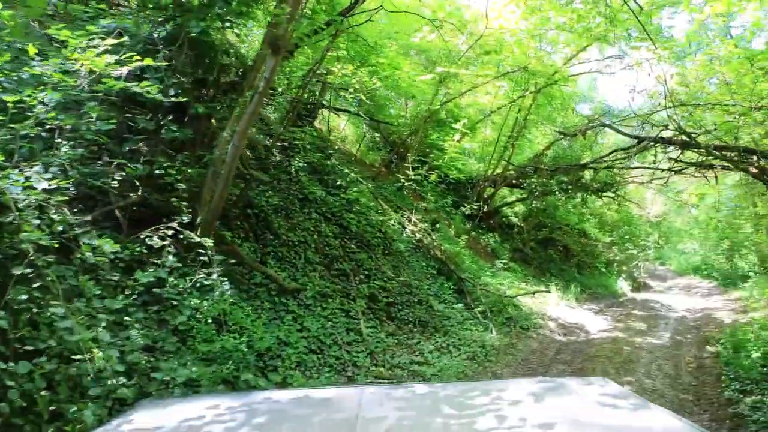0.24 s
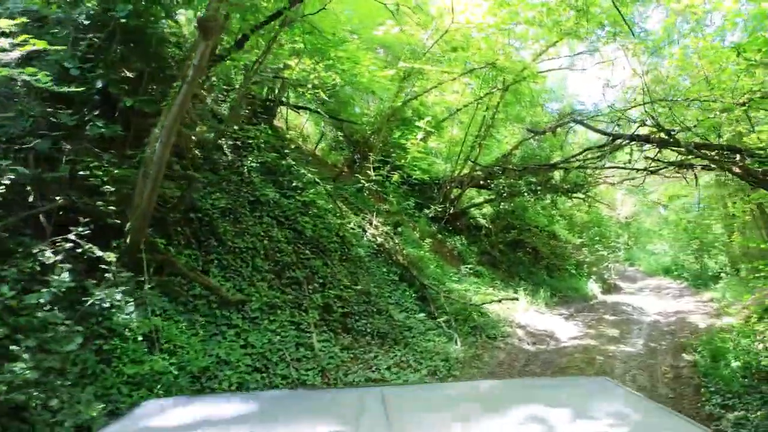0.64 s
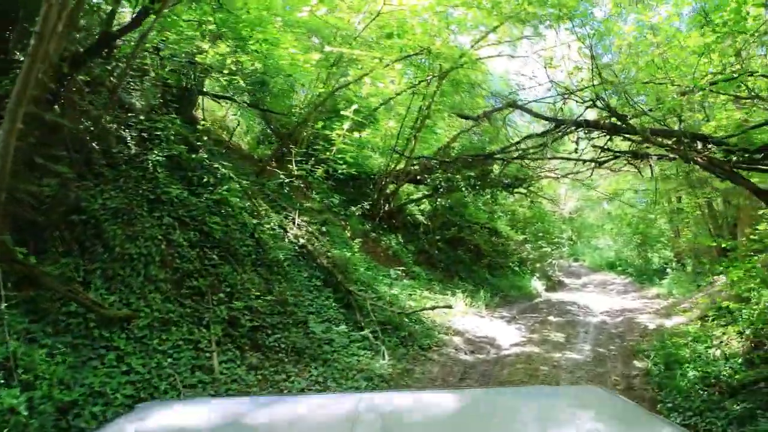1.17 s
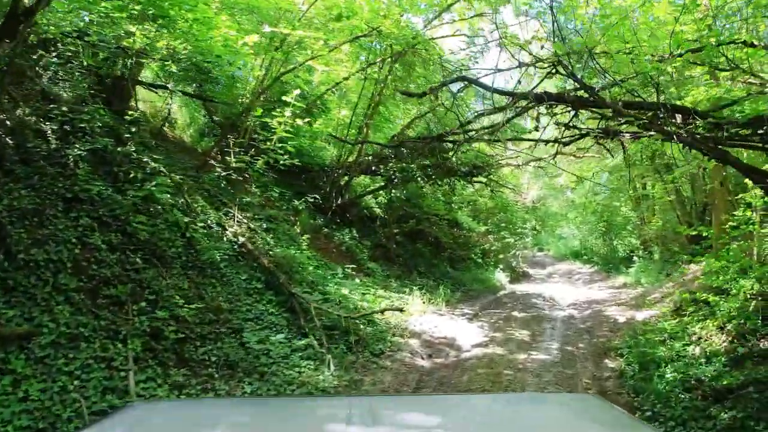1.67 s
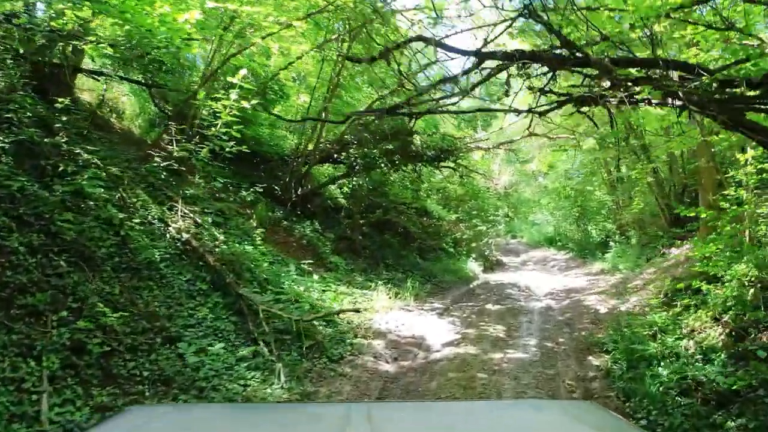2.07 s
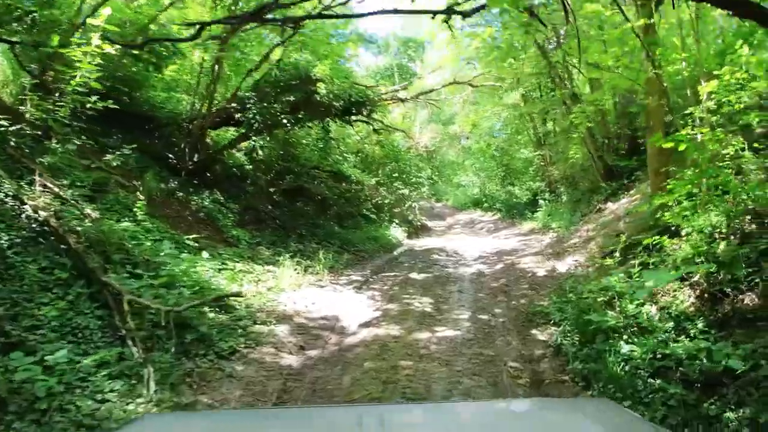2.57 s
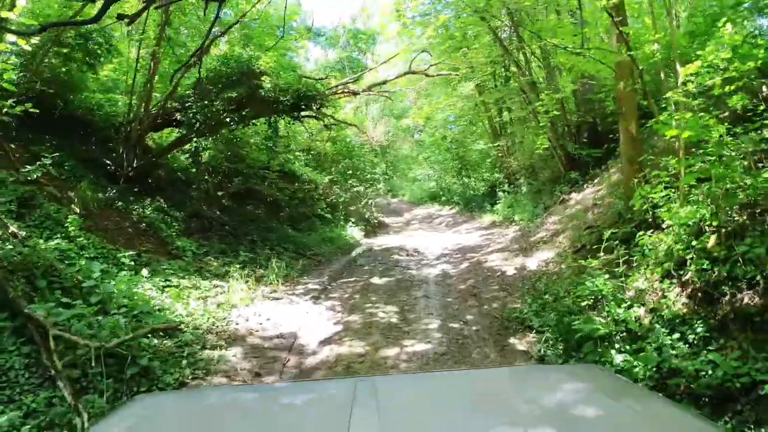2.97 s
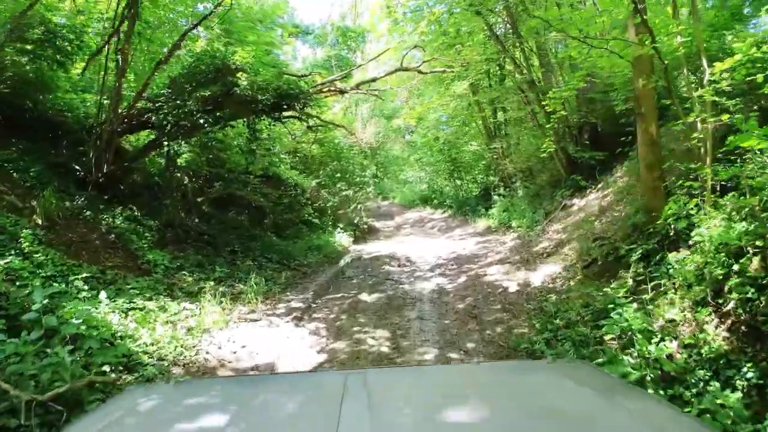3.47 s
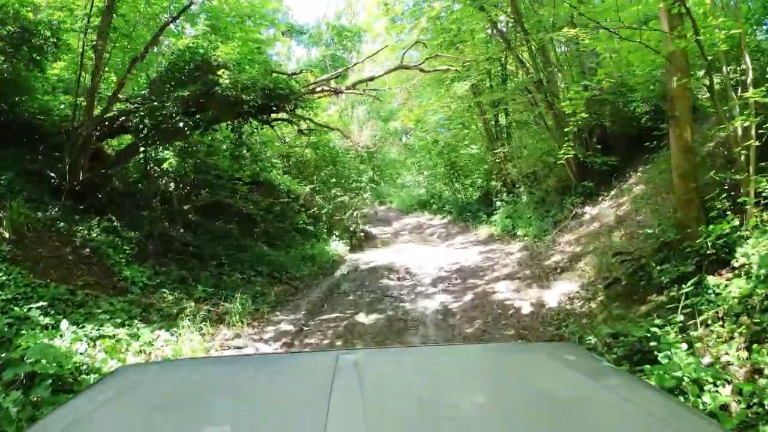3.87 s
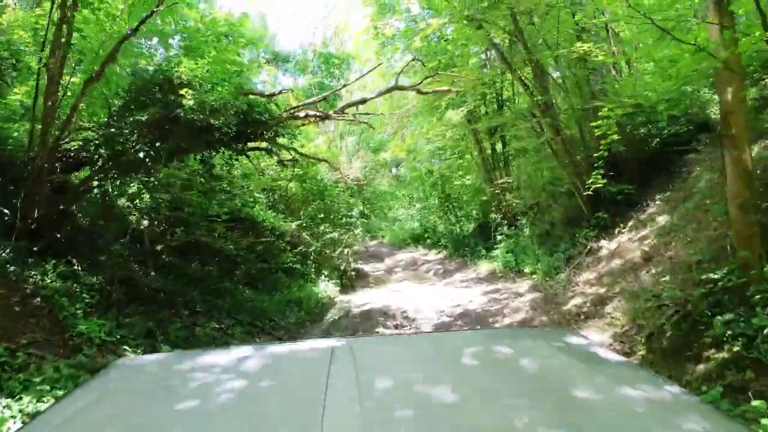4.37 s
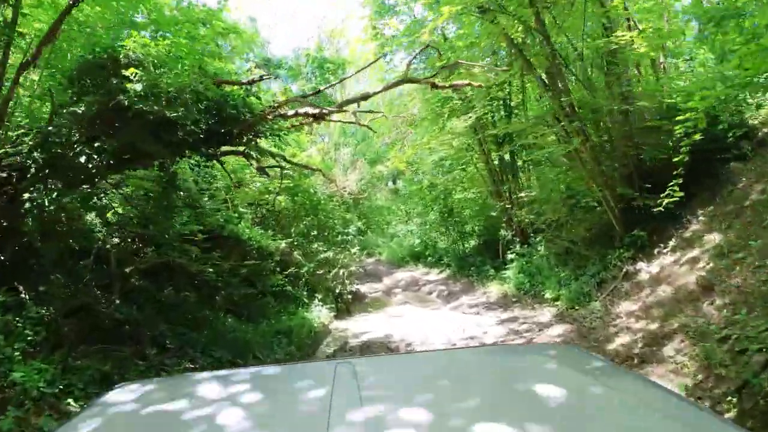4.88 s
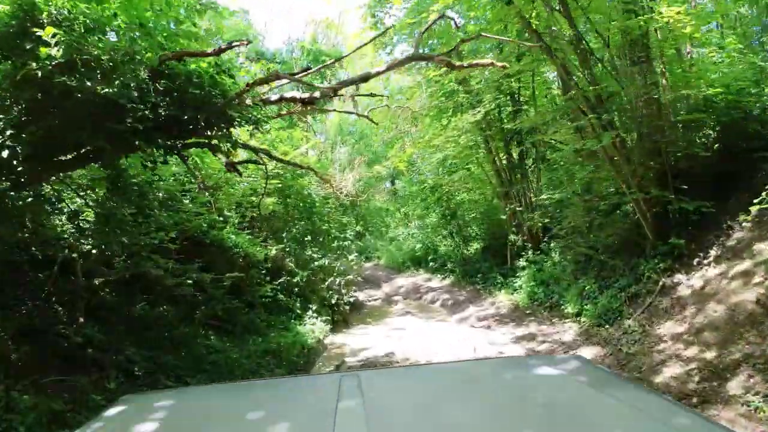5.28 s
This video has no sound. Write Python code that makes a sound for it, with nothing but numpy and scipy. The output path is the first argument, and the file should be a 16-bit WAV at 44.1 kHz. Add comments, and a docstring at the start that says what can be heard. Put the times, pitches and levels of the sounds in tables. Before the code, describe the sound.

Inside an off-road car on a rough forest track, with the microphone near the windscreen, a low, slightly uneven engine boom dominates. A knock lands right at the start, then a loud cluster of clunks and loose-metal rattles at 0.3-0.4 s with a burst of leafy hiss. The engine rises until about 0.7 s, with a very faint high squeal, then sags to a low lugging note near 1.4 s; a dull thump comes at 1.06 s and foliage swipes at 1.2 s. It pulls up again by 2 s, where sharper knocks hit, drops near 2.7 s, then revs quickly past 3 s with a last small bump. Gravel hiss swells around 2.4-2.9 s. A brief ease at 3.3 s leads to a steadier, higher drone, fullest around 4-4.8 s, easing slightly at the end. Tyre rumble and soft hiss continue throughout.

```python
"""Engine orders of a six-cylinder off-road car boom in the cabin on a rough forest track, near the windscreen.
The engine is sines locked to the firing count, with pulses ringing cabin and body, a faint gear whine,
a panel hum and a squeal. Tyres rumble as shaped noise through body resonances, and air, gravel and
leaves hiss as brighter noise. Bumps knock panels and loose metal: noise rattles into decaying modes."""
import sys
import numpy as np
from scipy import signal
from scipy.fft import rfft, irfft, next_fast_len
from scipy.io import wavfile
from scipy.ndimage import uniform_filter1d

SR = 44100
rng = np.random.default_rng(int(sys.argv[2]) if len(sys.argv) > 2 else 0)


def transcribe(signal):
    """Save signal, clipped to [-1, 1], as a 16-bit WAV file at the path in sys.argv[1]."""
    frames = np.atleast_2d(signal).T
    limited = np.clip(frames, -1, 1)
    pcm = np.round(limited * 32767).astype(np.int16)
    wavfile.write(sys.argv[1], SR, pcm)


def volts_from_decibels(level):
    """Turn decibel levels (scalar or array-like) into linear amplitude factors."""
    exponent = np.asarray(level, float) / 20
    return 10 ** exponent


N = 243873
T = np.arange(N) / SR
SIZE = next_fast_len(N)
F = np.maximum(np.fft.rfftfreq(SIZE, 1 / SR), 1)
PORTS = np.array([[.5], [-.5]])  # left and right share of a phase lead

# body resonances: (pitch [Hz], base width [Hz], relative level [dB], phase between the ports [rad])
BODY_MODES = [(299.5, 18, -12.5, 0.68), (387, 74, -21, 1.03), (490, 20.6, -20, 2.4), (580, 7, -16.5, 1)]


def level(x, db):
    """Scale to an rms level."""
    return x * volts_from_decibels(db) / np.sqrt(np.mean(x ** 2))


def along(table):
    """Read a (Hz, value) table on the log-frequency axis."""
    hz, value = np.transpose(table)
    return np.interp(np.log(F), np.log(np.maximum(hz, 1)), value)


def curves(table):
    """Columns of a (s, ..) table, one value a sample."""
    s, *columns = np.transpose(table)
    return [np.interp(T, s, column) for column in columns]


def walk(rate):
    """Random levels held 1 / rate s and slewed twice; spread near 1."""
    hold = int(SR / rate)
    steps = np.repeat(rng.standard_normal(N // hold + 1), hold)
    slewed = uniform_filter1d(uniform_filter1d(steps, hold), hold)
    return 1.237 * slewed[:N]


def resonate(x, hz, width):
    """One resonance, gain 1 at its centre."""
    return signal.lfilter(*signal.iirpeak(hz, hz / width, fs=SR), x)


def resonate_twice(x, hz, width):
    """The same resonance in series with itself, for steeper skirts."""
    return resonate(resonate(x, hz, width), hz, width)


def wide_noise(colour, grit_db, flicker_db, shared_db):
    """Stereo noise in octave bands: grains of uneven size, each band flickering alone and all together."""
    # (pitch [Hz], likeness of left and right [0-1])
    port_likeness = [(30, .05), (130, 0.47), (400, 0.57), (700, 0.62), (1410, 0.64), (3100, 0.02),
                     (6800, 0)]
    grains = np.repeat(rng.exponential(size=SIZE // 64 + 1), 64)[:SIZE]
    mid, side = rfft(rng.standard_normal((2, SIZE)) * volts_from_decibels(grit_db * grains))
    alike = np.clip(along(port_likeness), 0, .99)
    spread = side * np.sqrt(1 - alike) * np.array([[1], [-1]])
    pair = volts_from_decibels(along(colour)) * (mid * np.sqrt(1 + alike) + spread)
    out = 0
    for octave in range(4, 15):  # centred on 2 ** octave Hz
        share = np.cos(np.pi / 2 * np.clip(np.log2(F) - octave, -1, 1)) ** 2
        out = out + irfft(pair * share, SIZE)[:, :N] * volts_from_decibels(flicker_db * walk(16))
    return level(out * volts_from_decibels(shared_db * walk(7)), 0)


def firing_boom(hz, load_db, turns):
    """Multiples of the firing rate sound as sines, swelling with load and where the cabin passes them."""
    # (multiple of the firing rate, relative level [dB], share of the load it follows, phase left leads [rad])
    orders_heard = [(1, 5, 0.14, 0.72), (1.5, -22.5, 0.27, 0.29), (2, -10.5, 0.96, 0.26),
                    (2.5, -27, 0.71, 0.33), (3, -20.5, 1, 0.53), (4, -18.5, 0.98, 0.3)]
    # how the cabin passes a steady engine tone: (pitch [Hz], gain [dB])
    cabin_gain = [(45, -50), (66, -41.5), (78, -32), (90, -26), (101, -11), (111, -8.5), (122, -1.5),
                  (135, -1.5), (147, -2), (156, 3), (164, -4), (180, -18), (205, -4.5), (225, -31),
                  (250, -33), (300, -13), (330, -42)]
    boom = 0
    for k, db, follows, lead in orders_heard:
        order = np.round(2 * k) / 2
        cabin_db = np.interp(order * hz, *np.transpose(cabin_gain))
        heard_db = db + follows * load_db + cabin_db + 1.1 * walk(17)
        tone = np.sqrt(2) * np.sin(2 * np.pi * order * turns + lead * PORTS)
        boom = boom + volts_from_decibels(heard_db) * tone / np.cos(lead / 2)  # the cosine keeps the mono level
    return boom


def cylinder_lope(turns):
    """One cylinder fires harder: an extra push every full cycle, which the cabin air rings with."""
    # air resonances of the cabin: (pitch [Hz], width of each of two passes [Hz], relative level [dB])
    air_modes = [(109.2, 13, -8), (146, 33.6, 2.5), (209, 23, -0.5)]
    cylinders, scatter_db = 6, 3.5
    cycle = np.floor(turns / cylinders).astype(int)
    strength = volts_from_decibels(scatter_db * rng.standard_normal(size=N // 1000))
    push = np.diff(cycle, prepend=0) * strength[cycle]
    lope = sum(volts_from_decibels(db) * resonate_twice(push, f, w) for f, w, db in air_modes)
    return level(lope, -28)


def firing_ring(load_db, turns):
    """Every firing also jolts the body panels, harder under load."""
    jolts = np.diff(np.floor(turns), prepend=0) * volts_from_decibels(0.5 * load_db + 2.6 * walk(40))
    ring = sum(volts_from_decibels(db) * resonate_twice(jolts, f, 2.6 * w) for f, w, db, _ in BODY_MODES)
    return level(ring, -32.5)


def gear_whine(hz, turns):
    """A gear mesh tied to the crank whines faintly, rising where its housing rings near one pitch."""
    mesh_ratio = 16.9  # over the firing rate
    whine_db, housing_rise_db, housing_hz, housing_width_hz = -55, 15, 1255, 120
    mesh = 2 * np.pi * mesh_ratio * turns + 1.3 * walk(30)
    nearness = np.exp(-((mesh_ratio * hz - housing_hz) / housing_width_hz) ** 2)
    return volts_from_decibels(whine_db + housing_rise_db * nearness + 2.6 * walk(8)) * np.sin(mesh)


def panel_hum(hz, turns):
    """A panel hums when three times the firing rate meets its pitch."""
    order, panel_hz, width_hz, hum_db, waver_db = 3, 147.3, 5, -20.5, 2.5
    nearness = np.exp(-((order * hz - panel_hz) / width_hz) ** 2)
    tone = np.sqrt(2) * np.sin(2 * np.pi * order * turns + 0.66 * PORTS)
    return volts_from_decibels(hum_db + waver_db * walk(9.35)) * nearness * tone


def squeal():
    """A faint squeal near one pitch comes and goes, wavering in level and phase."""
    # (middle [s], half length [s], level [dB])
    squeal_swells = [(.72, .2, -42), (1.4, .12, -47)]
    squeal_hz = 2510
    swell = sum(volts_from_decibels(db) * np.exp(-((T - s) / half) ** 4) for s, half, db in squeal_swells)
    tone = np.sin(2 * np.pi * squeal_hz * T + 1.3 * walk(40.8))
    return swell * volts_from_decibels(1.99 * walk(14.7)) * tone


def engine():
    """One slightly unsteady firing count drives boom, lope, body ring, whine and hum; the squeal runs free."""
    # (time [s], firing rate [Hz], load [dB]): load falls as the throttle is eased
    throttle_ride = [(0, 66.2, -3.5), (.3, 69, -5.5), (.6, 72.9, 0.5), (.82, 72.76, -1), (.95, 66.47, -4.5),
                     (1.1, 53.3, -9), (1.25, 49.6, -9.5), (1.42, 44.5, 0.5), (1.58, 49.4, -1),
                     (1.8, 63.97, 2), (2.0, 69.8, 1.5), (2.2, 67.35, 1), (2.33, 62, 0.5),
                     (2.46, 54.07, -22), (2.68, 48.35, -5.5), (2.8, 49.6, -10), (2.92, 58.1, 1),
                     (3.08, 72.1, 1), (3.3, 76, -18), (3.45, 74.73, -5), (3.75, 74.97, -2.5),
                     (4.05, 77.53, 3), (4.3, 81.88, 2.5), (4.6, 81.6, 2.5), (4.85, 80.03, -1),
                     (5.05, 79.9, -6), (5.38, 75.67, 2.5), (5.53, 70.24, -6)]
    hz, load_db = curves(throttle_ride)
    turns = np.cumsum(hz * (1 + 0.0032 * walk(20))) / SR  # firings so far
    pulses = cylinder_lope(turns) + firing_ring(load_db, turns)
    tones = gear_whine(hz, turns) + panel_hum(hz, turns) + squeal()
    return firing_boom(hz, load_db, turns) + pulses + tones


def tyre_rumble(rolling_db):
    """Tyres on dirt shake the body: low wide noise plus panel resonances, partly following the rolling level."""
    # (pitch [Hz], relative level per Hz [dB])
    rumble_colour = [(20, -15), (38, -20.5), (60, -2.5), (100, 1), (150, 9), (180, 2.5), (215, 3.5),
                     (310, 0.5), (500, -5), (1000, -10), (2000, -21.5), (4000, -30), (8000, -75)]
    rumble_db, follows = -20.5, 0.47  # follows: share of the rolling level
    rumble = wide_noise(rumble_colour, grit_db=0.9, flicker_db=0.6, shared_db=0.74)
    for f, w, db, turn in BODY_MODES:
        # each panel reaches the two ports with its own phase
        ring = signal.hilbert(resonate(rng.standard_normal(SIZE), f, w))[:N]
        pair = np.real([ring, ring * np.exp(1j * turn)])
        rumble = rumble + level(pair, db) * volts_from_decibels(3.2 * walk(2.93))
    return volts_from_decibels(rumble_db + follows * rolling_db) * rumble


def road_hiss(rolling_db, spray_db):
    """Gravel, air and leaves hiss: tyres fill the middle, spray and swipes are heard in the treble."""
    # (pitch [Hz], relative level per Hz [dB])
    hiss_colour = [(500, -10), (1200, 12), (2500, 8), (3800, 3.5), (5600, -9.5), (8700, -10), (9940, -13),
                   (11200, -2), (11800, -1), (15720, 0.5), (15780, -39)]
    hiss_db, spray_above_hz = -31, 5800
    hiss = wide_noise(hiss_colour, grit_db=1.0, flicker_db=1.73, shared_db=0.8)
    highpass = signal.butter(2, spray_above_hz, "high", fs=SR, output="sos")
    treble = signal.sosfiltfilt(highpass, hiss)
    middle = hiss - treble
    return volts_from_decibels(hiss_db) * (volts_from_decibels(rolling_db) * middle + volts_from_decibels(spray_db + brushes()) * treble)


def road():
    """The ground under the car drives both the rumble and the hiss."""
    # (time [s], tyres rolling [dB], foliage and gravel spray [dB])
    ground_ride = [(0, -4.5, 2), (.3, -1, -0.5), (.45, 0, 0.5), (.9, -1.5, -3), (1.15, -3.5, -2),
                   (1.4, -9, -10.5), (1.6, -6.5, -7), (1.87, -2.5, -3), (2.05, -0.5, -1), (2.4, 2, 3.5),
                   (2.65, 2.5, 6.5), (2.9, 2.5, 6.5), (3.1, 0, 1.5), (3.75, 0.5, -0.5), (4.13, 2, 1.5),
                   (4.45, 2, 4), (4.82, 2.5, 4.5), (5.05, .5, 0.5), (5.53, -0.5, -2.5)]
    rolling_db, spray_db = curves(ground_ride)
    return tyre_rumble(rolling_db) + road_hiss(rolling_db, spray_db)


def panel_ring(hz, t):
    """Panel modes decay in each port with slightly uneven levels, strongest near the struck part's pitch."""
    # panels and loose fittings: (pitch [Hz], relative level [dB], time to fall 60 dB [s])
    panel_modes = [(196, 1.5, 0.052), (217, -0.5, 0.15), (257, -5.5, 0.18), (367, -1.5, 0.061),
                   (500, -0.5, 0.041), (675, 1.5, 0.03), (933, -8.5, 0.075), (1290, -13, 0.039),
                   (1548, -6, 0.039), (1800, -3.5, 0.015), (2250, -17.5, 0.031)]
    uneven_db = 0.5 * rng.standard_normal((len(panel_modes), 2))
    ring = 0
    for (f, db, t60), port_db in zip(panel_modes, uneven_db):
        strength = volts_from_decibels(db - 8.6 * np.log2(f / hz) ** 2 + port_db[:, None])
        ring = ring + strength * np.exp(-np.log(1000) * t / t60) * np.sin(2 * np.pi * f * t)
    return ring


def knocks():
    """Each bump is a short rattle of blows into the panel modes, with a broad contact crack."""
    # (time [s], peak before the final filter [dB], pitch of the struck part [Hz], rattle decay time [s])
    bumps = [(.005, -3.5, 408, 0.042), (0.307, -6.5, 880, 0.0032), (0.321, 0, 232, 0.066),
             (0.372, -7, 860, 0.019), (0.387, -3.5, 228, 0.032), (0.673, -31, 2000, 0.0077),
             (1, -18, 1990, 0.0051), (1.06, -7.5, 207.5, 0.048), (1.059, -22, 2700, .006),
             (1.215, -16.5, 700, 0.011), (1.343, -23, 1906, 0.0091), (1.656, -17, 1290, 0.011),
             (1.87, -8.5, 1800, 0.011), (1.993, -5, 1360, 0.0063), (2.004, -7, 598.5, 0.022),
             (2.395, -20, 1800, .012), (2.553, -13, 1800, 0.0098), (2.711, -11, 600, 0.013),
             (3.05, -13, 209.3, 0.025)]
    crack_db = -15.5  # peak, against the peak of the ring
    out, t = np.zeros((2, N + SR)), np.arange(0, .35, 1 / SR)
    for s, db, hz, length in bumps:
        rattle = np.exp(-t / max(length, .002)) * np.minimum(t / 0.0012, 1)
        blows = rng.standard_normal((3, len(t))) * rattle
        blows = blows[0] + 0.82 * blows[1:]  # partly shared by the ports
        hit = signal.fftconvolve(panel_ring(hz, t), blows, axes=1)[:, :len(t)]
        # the contact itself is a broad crack above the ring
        crack = resonate_twice(blows, 1.27 * hz, 2.0 * hz)
        hit = hit / np.abs(hit).max() + volts_from_decibels(crack_db) * crack / np.abs(crack).max()
        i = int(s * SR)
        out[:, i:i + len(t)] += hit * volts_from_decibels(db) / np.abs(hit.mean(axis=0)).max()
    # the knocks carry no deep bass, and trim muffles the treble
    band = signal.butter(3, (130, 4600), "band", fs=SR, output="sos")
    return signal.sosfilt(band, out[:, :N])


def brushes():
    """Leaves and twigs swipe the car: a sudden rise of the hiss in dB that dies away, some strong, many faint."""
    # (time [s], rise of the treble hiss [dB], fade time [s])
    strong_swipes = [(.31, 8, 0.19), (.92, 6.5, 0.025), (1.17, 1, 0.021), (1.22, 10.5, 0.15),
                     (1.96, 8, 0.036), (2.62, 4.5, 0.022), (3.05, 8, 0.012), (3.56, 6, 0.037)]
    faint_swipes = [(s * N / SR, 4.2 * size, .03) for s, size in rng.random((45, 2))]
    rise_db = 0
    for s, db, fade in list(strong_swipes) + faint_swipes:
        rise_db = rise_db + db * np.exp(-np.maximum(T - s, 0) / fade) * (T >= s)
    return rise_db


def scene():
    """Everything inside the cabin; the two ports differ in colour, the right mostly louder."""
    # (pitch [Hz], left minus right [dB])
    port_colour = [(30, -4), (60, -1), (110, -4.5), (200, -2), (700, -2.5), (1290, -1.5), (2380, -2.5),
                   (4400, -5), (6500, 3.5), (8500, -3), (10200, -7.5), (11500, -6.5), (15000, 1)]
    both = rfft(engine() + road() + knocks(), SIZE)
    tilt_db = along(port_colour) * np.array([[1], [-1]]) / 2
    return irfft(both * volts_from_decibels(tilt_db), SIZE)[:, :N]


def band_limit(x):
    """A steep low-pass at the top of the band."""
    return signal.sosfilt(signal.butter(12, 16800, fs=SR, output="sos"), x)


def record(dry):
    """The camera clips any peak beyond full scale."""
    clipped = np.clip(dry, -1, 1)
    return band_limit(clipped)


dry = scene()
out = record(dry)
transcribe(out)
```